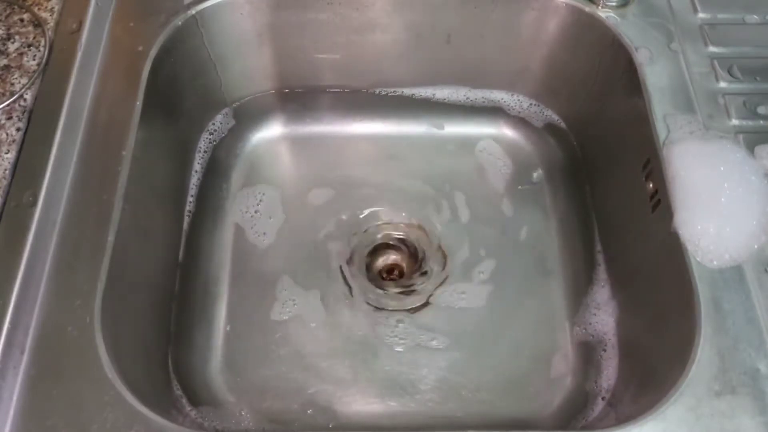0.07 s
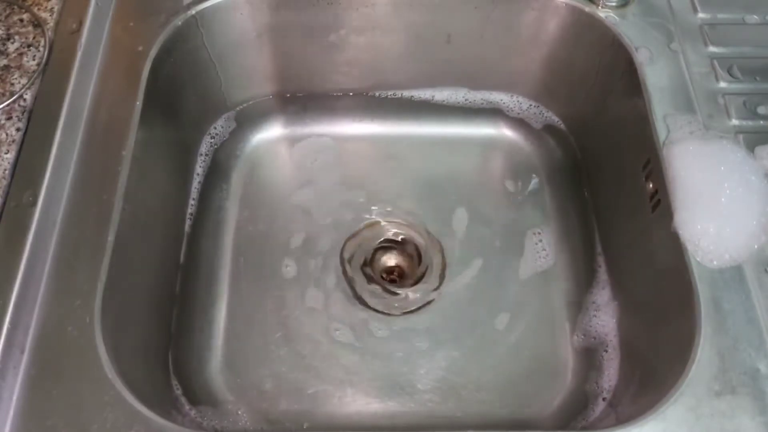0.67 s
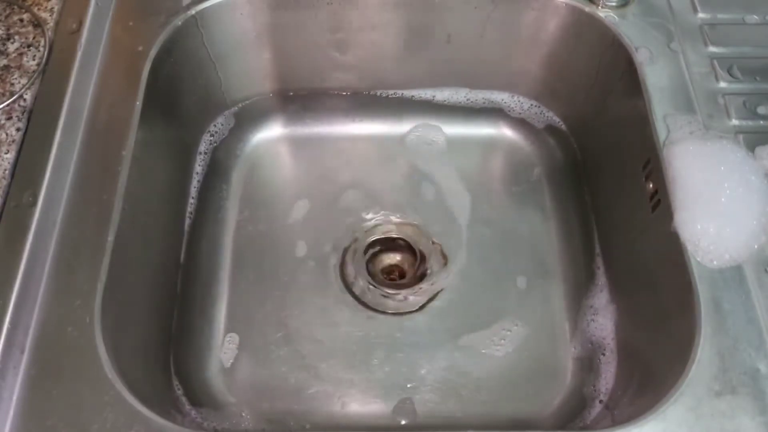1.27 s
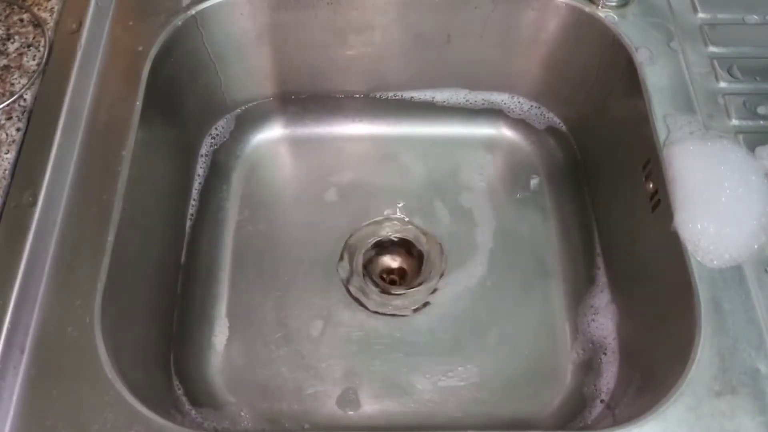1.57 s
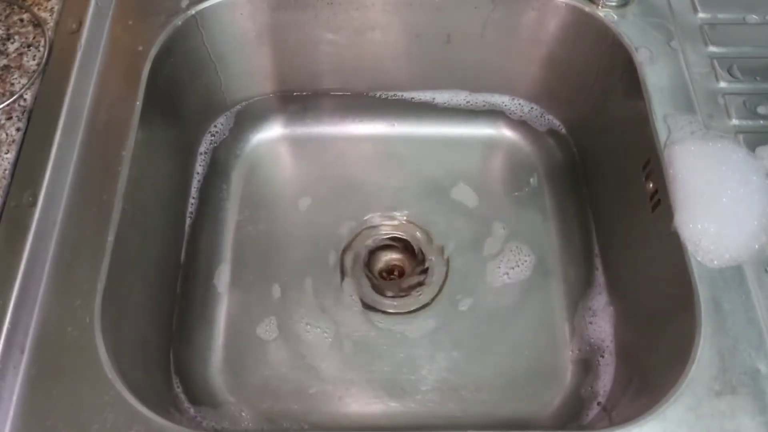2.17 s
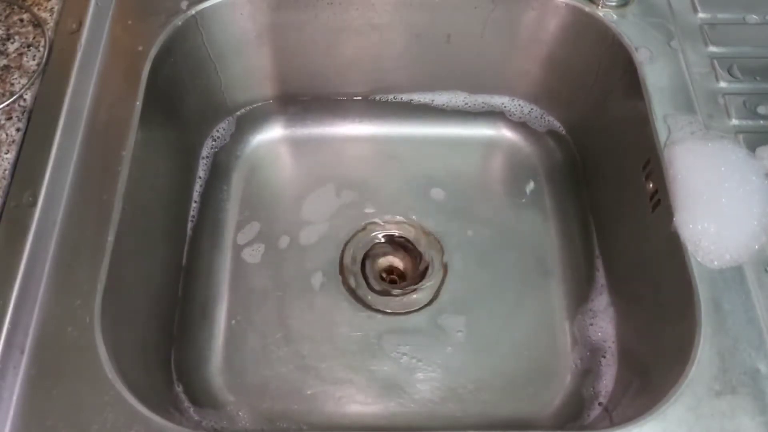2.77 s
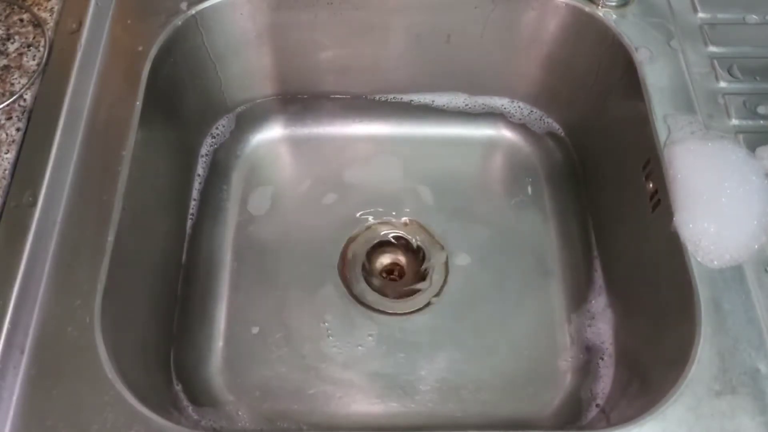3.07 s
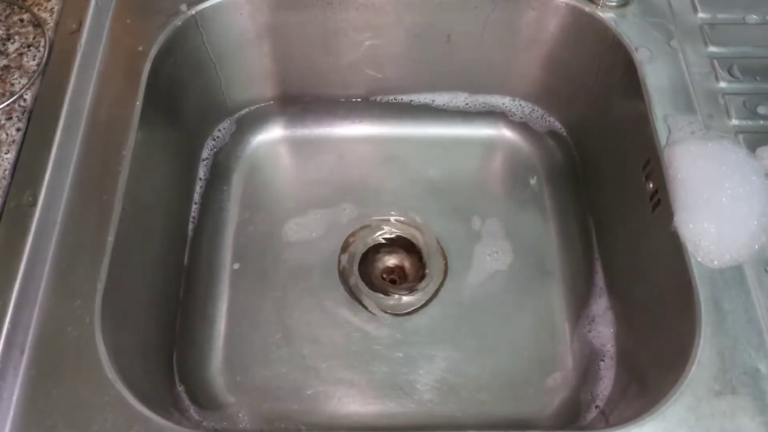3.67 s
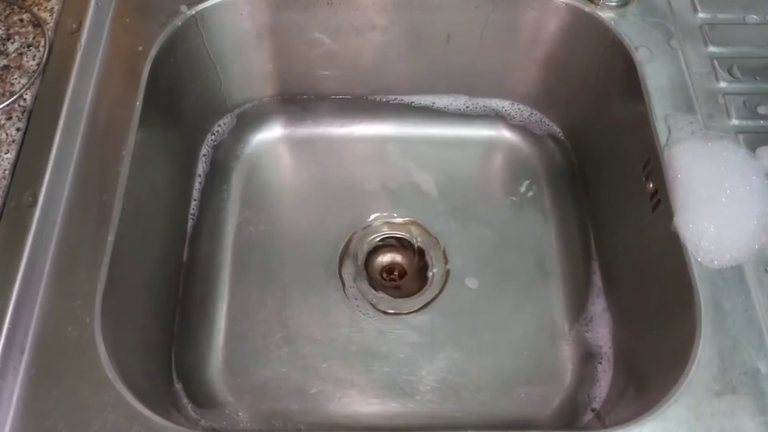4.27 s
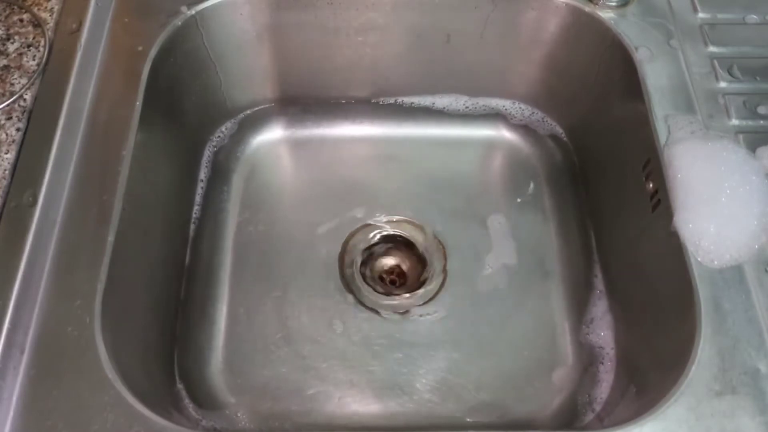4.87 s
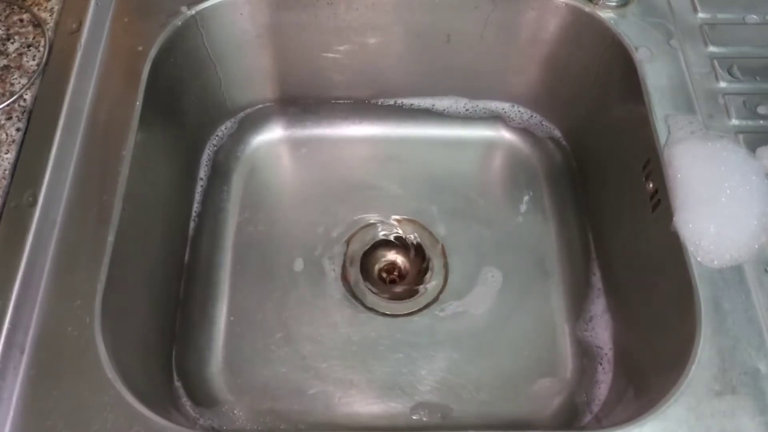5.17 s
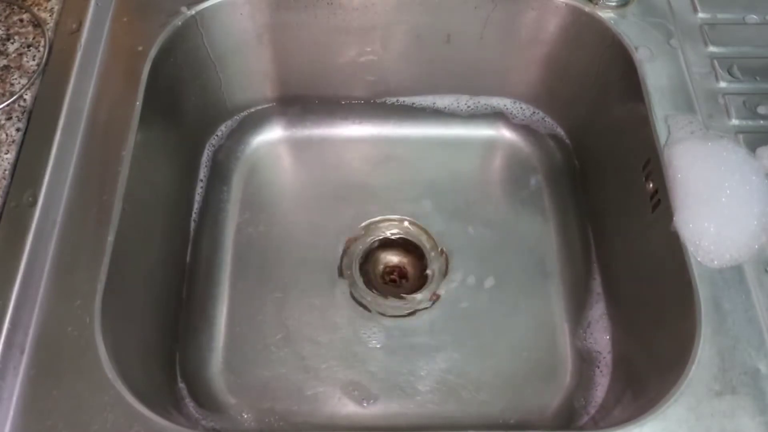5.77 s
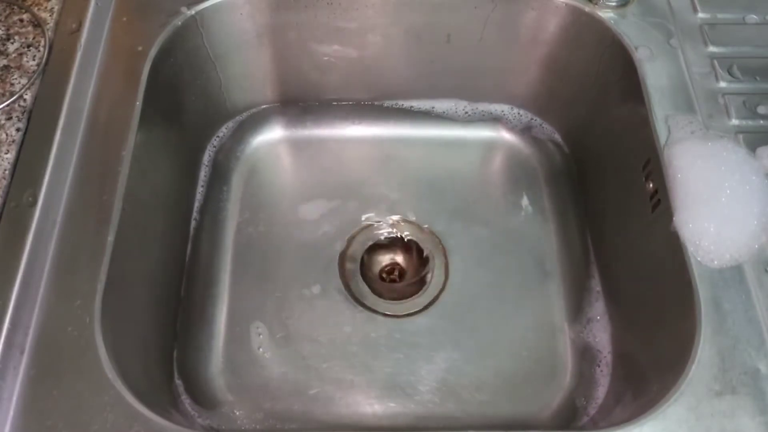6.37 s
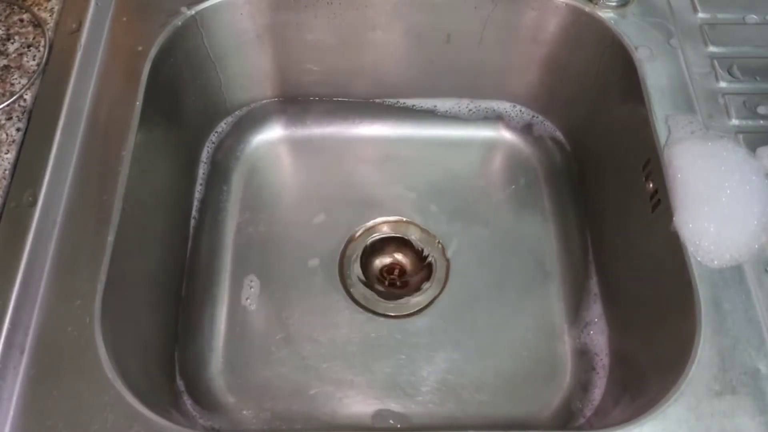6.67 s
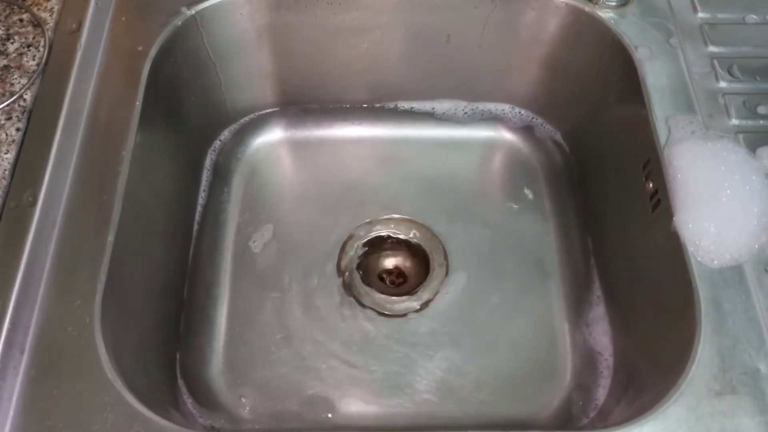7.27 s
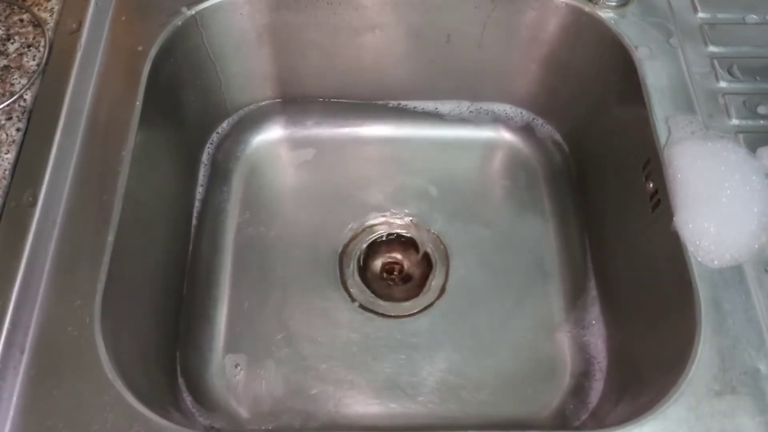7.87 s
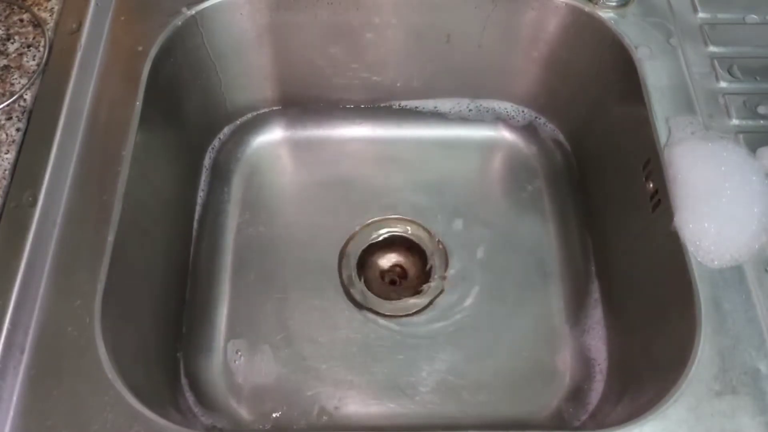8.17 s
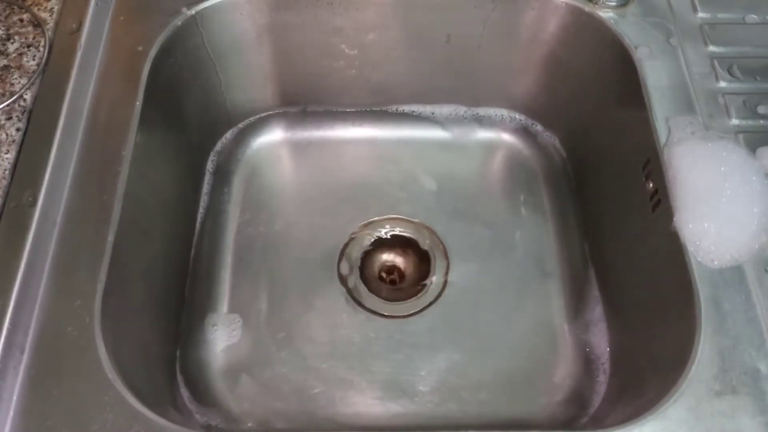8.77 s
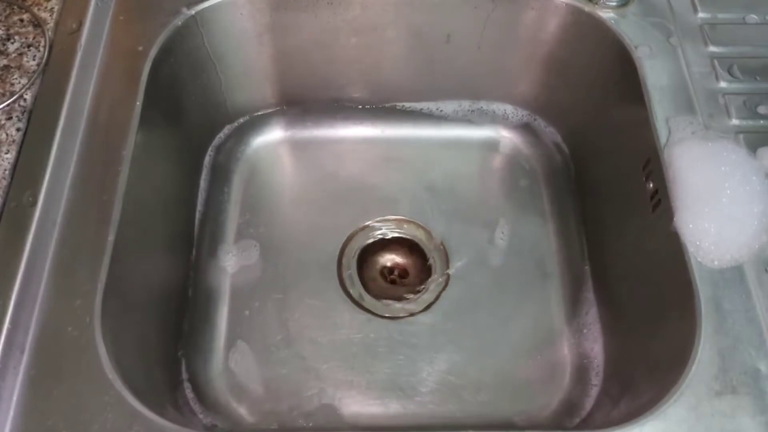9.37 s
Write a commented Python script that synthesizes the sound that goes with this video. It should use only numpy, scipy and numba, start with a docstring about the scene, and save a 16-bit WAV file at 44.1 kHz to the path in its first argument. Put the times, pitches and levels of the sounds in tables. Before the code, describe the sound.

The last water swirls down a steel kitchen sink's drain, gurgling and glugging over a low pipe drone, with tiny plinks and fizzing foam.

```python
"""The last shallow water swirls down the plughole of a steel kitchen sink, heard from just above.
From the start the falling stream rushes and makes the waste pipe drone, gulps of air gurgle as bubbles
in the throat under the strainer, small bubbles plink at the rim and foam fizzes; steel walls and kitchen
throw the bubbling back. From 0.5 s to 7.2 s occasional puffs of air thud on the microphone.
Two strong glugs come near 2.1 s; the water is still draining at the end, 9.4 s."""
import sys
import numpy as np
from scipy import signal
from scipy.fft import rfft, irfft, next_fast_len
from scipy.io import wavfile
from scipy.ndimage import uniform_filter1d
from numba import njit

SR = 44100
rng = np.random.default_rng(int(sys.argv[2]) if len(sys.argv) > 2 else 0)


def store_wav(level_fs):
    """Save 16-bit WAV to argv[1]."""
    pcm = np.round(np.clip(np.atleast_2d(level_fs), -1, 1) * 32767)
    wavfile.write(sys.argv[1], SR, pcm.T.astype(np.int16))


N = 415422
TIME_S = np.arange(N) / SR
FFT_SIZE = next_fast_len(N + SR)
FREQ_HZ = np.arange(FFT_SIZE // 2 + 1) * SR / FFT_SIZE + 1e-3

# spurts of the film breaking over the rim: start/s, length/s, relative level/dB, typical bubble f/Hz
SPURTS = [(-0.1, 1.05, -56, 7660), (0.6, 0.75, -53, 6330), (1.07, 0.4, -54.5, 7650),
          (2.21, 0.26, -55, 7500), (2.26, 1.5, -60, 6160), (2.6, 0.51, -54, 4500), (4.75, 0.35, -58, 10900),
          (3.21, 0.46, -58.5, 9200), (3.55, 0.79, -56.5, 4080), (4.02, 0.25, -57.5, 7400),
          (4.13, 0.51, -54, 7000), (4.55, 0.66, -53, 4560), (5.52, 0.31, -62, 8700), (5.7, 0.46, -57, 3660),
          (6.25, 0.16, -58, 10270.0), (7.12, 0.23, -62, 5670.0), (7.79, 0.3, -57.5, 11500),
          (8.38, 0.32, -57.5, 6000), (8.51, 0.54, -55, 10500), (8.85, 0.79, -60, 11500)]
SPURT_FALLOFF_DB = 12  # one octave from the typical pitch
SWELL_SHARE = 0.33  # rising part of a gulp, spurt or puff


def undb(db):
    """Decibels to gain."""
    return 10 ** (np.asarray(db) / 20)


def level(x, db):
    """Scale to an rms level."""
    return x * undb(db) / np.sqrt(np.mean(x ** 2))


def filtered(x, response):
    """Apply a frequency response."""
    return irfft(rfft(x, FFT_SIZE) * response, FFT_SIZE)[..., :N]


def resonances(modes):
    """Response of damped resonators driven together."""
    return sum(undb(db) / (1 + 1j * (FREQ_HZ ** 2 - hz ** 2) / (FREQ_HZ * width_hz))
               for hz, width_hz, db in modes)


def walk(rate_hz):
    """Random steps, smoothed twice; spread near 1."""
    hold = int(SR / rate_hz)
    steps = np.repeat(rng.standard_normal(2048), hold)[:N]
    return 1.3 * uniform_filter1d(uniform_filter1d(steps, hold), hold)


def stereo(mid, side):
    """Mid and side to left and right."""
    return mid + side * np.array([[1], [-1]])


@njit
def ring(starts_s, hz, cycles, gains, rise, swell_cycles):
    """Bubbles: sines that swell, then die by 60 dB over their life as the pitch rises."""
    out = np.zeros(N)
    for k in range(len(starts_s)):
        first, length = int(starts_s[k] * SR), cycles[k] * SR / hz[k]
        phase = 0.
        for i in range(min(int(length), N - first)):
            phase += hz[k] * (1 + rise * i / length) / SR
            attack = 1 - np.exp(-(phase / swell_cycles) ** 2)
            decay = np.exp(-np.log(1000) * i / length)
            out[first + i] += gains[k] * attack * decay * np.sin(2 * np.pi * phase)
    return out


def swarm(count, band_hz, cycles, spread_db, rise, swell_cycles):
    """Unevenly timed bubbles of random pitch, most faint, a few strong; rms 1."""
    low_hz, high_hz = band_hz
    jitter, pitch, life, faintness = rng.random((count, 4)).T
    starts_s = (np.arange(count) + 2 * jitter) / count * N / SR
    hz = low_hz * (high_hz / low_hz) ** pitch
    gains = undb(-spread_db * np.log(faintness + .04))
    return level(ring(starts_s, hz, cycles * (.5 + life), gains, rise, swell_cycles), 0)


def pops(table, cycles, rise, swell_cycles):
    """One bubble per row of t/s, level/dB, f/Hz."""
    starts_s, db, hz = np.transpose(table)
    return ring(starts_s, hz, np.full(len(hz), float(cycles)), undb(db), rise, swell_cycles)


def swell_and_fade(t, start_s, length_s):
    """Triangular envelope of a gulp, spurt or puff."""
    return np.interp(t, start_s + length_s * np.array([0, SWELL_SHARE, 1]), [0, 1, 0])


def bursts(table, bubble_hz, falloff_db, steady_db, sag_oct_per_s=0.27):
    """Gain of one bubble size: steady supply plus bursts whose pitch sinks as their bubbles grow."""
    t = TIME_S[::64]
    power = undb(steady_db) ** 2
    for start_s, length_s, db, hz in table:
        octaves_off = np.log2(bubble_hz / hz) + sag_oct_per_s * (t - start_s - SWELL_SHARE * length_s)
        gain = swell_and_fade(t, start_s, length_s) * undb(db - falloff_db * octaves_off ** 2)
        power = power + gain ** 2
    return np.interp(TIME_S, t, np.sqrt(power))


def space(x, walls_db, basin_db, kitchen_db, basin_t60_s=0.12, kitchen_t60_s=0.22, pan_db=-1.5):
    """Direct sound, single reflections, quick basin flutter and soft kitchen tail."""
    # reflections off steel walls and kitchen: delay/s, left/dB, right/dB (both relative to walls_db)
    echoes = [(.0013, -25, -34), (.0021, -35, -24), (.0075, -6.5, -2), (0.019, -21, -13)]
    out = x * undb(np.array([[pan_db], [-pan_db]]) / 2)
    for delay_s, left_db, right_db in echoes:
        lag = int(delay_s * SR)
        out[:, lag:] += x[:N - lag] * undb(walls_db + np.array([[left_db], [right_db]]))
    t = TIME_S[:SR // 2]
    tail_power = 0
    for onset_s, t60_s, db in ((.002, basin_t60_s, basin_db), (.009, kitchen_t60_s, kitchen_db)):
        decay = (t > onset_s) * np.exp(-2 * np.log(1000) * t / t60_s)
        tail_power = tail_power + undb(db) ** 2 * decay / decay.sum()
    # moving water: the scattered sound drifts between four sets of paths
    shares = np.array([walk(rate_hz=6) for _ in range(4)])
    shares /= np.sqrt(np.sum(shares ** 2, axis=0) + .05)
    for share in shares:
        tail = rng.standard_normal((2, len(t))) * np.sqrt(tail_power)
        out += share * signal.oaconvolve(x[None], tail, axes=1)[:, :N]
    return out


def pipe_drone(slosh_db=2, slosh_hz=11, cutoff_hz=116):
    """The falling stream shakes the waste pipe's air column; sloshing makes the drone waver."""
    # drone of the water falling down the pipe: t/s, relative level/dB
    fall = [(0.0, -44.5), (0.26, -39), (0.36, -48), (0.43, -40.5), (0.6, -43.5), (0.73, -37.5),
            (0.8, -48.5), (1.05, -40), (1.21, -44), (1.41, -38), (1.47, -53), (1.54, -39.5), (1.7, -40),
            (1.77, -49.5), (1.9, -43.5), (2.25, -38.5), (2.33, -43.5), (2.58, -40), (2.65, -52),
            (2.75, -38), (2.97, -46.5), (3.03, -35.5), (3.14, -44), (3.5, -45.5), (3.58, -35), (3.76, -45),
            (3.84, -40), (4.31, -42), (4.38, -37.5), (4.5, -46.5), (5.19, -40.5), (5.43, -42.5),
            (5.55, -42), (5.85, -39.5), (6.0, -35.5), (6.18, -44), (6.27, -33.5), (6.35, -44.5),
            (6.71, -38.5), (7.2, -44), (7.66, -43.5), (7.75, -50), (8.05, -37), (8.5, -41), (9.42, -42.5)]
    # lowest air resonance of the pipe: f/Hz, width/Hz, gain/dB
    pipe_mode = [(93.7, 22.2, 0)]
    flow_db = np.interp(TIME_S, *np.transpose(fall)) + slosh_db * walk(slosh_hz)
    lowpass = 1 / np.sqrt(1 + (FREQ_HZ / cutoff_hz) ** 20)
    column, scattered = filtered(rng.standard_normal((2, N)), resonances(pipe_mode) ** 2)
    # steady drive: flatten the noise envelope so that strength follows flow
    window = np.hanning(SR // 10) * 20 / SR
    envelope = np.sqrt(signal.fftconvolve(column ** 2, window, "same") + 1e-12)
    mid = level(filtered(column / envelope * undb(flow_db), lowpass), -44)
    side = level(filtered(scattered, lowpass), -69)
    return stereo(mid, side) * undb([[.4], [-.4]])


def trap_splash():
    """Splashing along the pipe rings the trap; part arrives centred, part scattered."""
    # hollow resonances of trap and basin: f/Hz, width/Hz, relative gain/dB
    trap_modes = [(163, 11.4, -8), (212, 50, -15.5), (296, 9.5, -14.5), (326.5, 22.5, -3.5),
                  (395.1, 8.3, 6.5), (411, 22.5, -0.5), (544, 110, -12), (621.5, 21, -3), (672.3, 23, -3.5)]
    splashes = np.array([swarm(9000, (135.8, 904), cycles=4.37, spread_db=2, rise=0.26, swell_cycles=0.26)
                         for _ in range(2)])
    mid, side = filtered(splashes * undb(0.86 * walk(rate_hz=9)), resonances(trap_modes))
    return stereo(level(mid, -50.5), level(side, -63.5))


def stream_rush(wander_db=2.5):
    """Smooth noise of moving water; the bass is nearly mono."""
    # spectrum of the stream: f/Hz, relative density/dB
    spectrum = [(20, -28), (48, 4), (75, 7), (135, -13), (220, -8.5), (550, -6), (850, -14), (1200, -13.5),
                (2600, -20.5), (3600, -31), (8000, -35.5), (15000, -40)]
    hz, db = np.transpose(spectrum)
    colour = undb(np.interp(np.log(FREQ_HZ), np.log(hz), db))
    width = 0.53 * np.interp(FREQ_HZ, [45, 170, 700, 11000], [0.13, 0.23, 1.8, 0.88])
    mid = filtered(rng.standard_normal(N), colour)
    side = filtered(rng.standard_normal(N), colour * width)
    return level(stereo(mid, side), -50) * undb(wander_db * walk(rate_hz=9.3))


def throat_gurgle(falloff_db=27.5):
    """The vortex tears gulps of air into bubbles, which ring the cavity under the strainer."""
    # gulps of air drawn in: start/s, length/s, relative level/dB, typical bubble f/Hz
    gulps = [(-0.26, 1.15, -45, 1960), (0.76, 0.36, -42.5, 1850), (0.92, 0.39, -39, 1500),
             (1.08, 0.37, -47.5, 2250), (1.3, 0.48, -43, 1640), (1.62, 0.24, -42, 1010),
             (1.76, 0.73, -38.5, 1680), (1.88, 0.38, -47.5, 2420), (2.07, 0.1, -47, 3200),
             (2.18, 0.38, -45, 1610), (2.42, 0.55, -46, 1900), (2.75, 0.21, -42, 900),
             (3.06, 0.24, -43, 2000), (3.14, 0.47, -40.5, 1590), (3.33, 0.24, -42.5, 900),
             (3.56, 0.46, -43.5, 1880), (3.92, 0.14, -42.5, 890), (4.08, 0.28, -40, 920),
             (4.1, 0.28, -45.5, 1860), (4.27, 0.23, -39.5, 1730), (4.85, 0.49, -45.5, 1000),
             (4.98, 0.3, -42, 1450), (5.3, 0.3, -44, 1850), (5.52, 0.18, -44, 950),
             (5.55, 0.29, -45.5, 1590), (5.82, 0.21, -42, 1680), (5.85, 0.26, -49, 2950),
             (5.95, 0.67, -49.5, 1550), (6.39, 0.35, -43, 2030), (6.92, 0.28, -49, 2460),
             (7.42, 0.21, -52, 2800), (7.03, 0.8, -49.5, 1520), (6.97, 0.45, -43.5, 960),
             (7.22, 0.41, -43.5, 980), (7.45, 0.81, -49, 1900), (7.66, 0.61, -57.5, 3100),
             (7.86, 0.26, -49.5, 1200), (8.18, 0.3, -43, 1820), (8.34, 0.17, -45, 890),
             (8.49, 0.35, -46.5, 1560), (8.66, 0.31, -40, 1960), (8.7, 0.52, -45, 900),
             (8.72, 0.49, -60, 3200), (8.84, 0.29, -45.5, 1860)]
    # big bubbles bursting in the throat: t/s, relative level/dB, f/Hz
    big_bubbles = [(0.1788, -23.5, 1800), (1.007, -21.5, 1750), (1.061, -21, 1670), (1.076, -22, 1650),
                   (1.151, -21, 1850), (1.202, -22.5, 1820), (1.4893, -28, 1710), (2.0903, -15.5, 1670),
                   (2.1235, -14.5, 1480), (2.173, -24, 1690), (2.232, -23, 1740), (2.2697, -19, 1520),
                   (2.313, -25, 1700), (2.6953, -28, 1800), (3.1146, -23, 1800), (3.263, -25, 1900),
                   (3.3215, -24, 1820), (3.6287, -23, 1630), (3.6805, -20, 1830), (3.8493, -22.5, 1640),
                   (4.204, -28, 1850), (4.4587, -19.5, 1720), (4.579, -28.5, 1840), (5.521, -23.5, 1670),
                   (5.5398, -20.5, 1780), (5.791, -28, 1780), (5.897, -20.5, 1850), (6.0583, -21.5, 1670),
                   (6.132, -19, 1630), (7.243, -24, 1340), (7.385, -27, 1400), (7.415, -25, 1010),
                   (7.7223, -27, 1800), (7.8321, -20.5, 1870), (8.297, -26, 1790), (8.544, -24.5, 1680),
                   (8.9443, -18.5, 1750), (8.974, -24.5, 1850)]
    # throat resonances: f/Hz, width/Hz, gain/dB
    throat_modes = [(1006.6, 23, 3.5), (1318, 25, -1), (1540, 73, -6), (1612, 110, -7), (1808, 117, -2.5),
                    (1840, 46, 4), (2198, 24, 8), (2377, 24, 1), (2460, 21, -12), (2604, 21, -19),
                    (2750, 17, -2), (2925, 24, -14), (2940, 51, -21)]
    cavity = resonances(throat_modes) + undb(-11.5)  # bubbles near the mouth also bypass the cavity
    swarms = [swarm(3400, (762, 1185), cycles=10.8, spread_db=5.5, rise=0.15, swell_cycles=1.6),
              swarm(2300, (1314, 1970), cycles=25.2, spread_db=2.5, rise=0.11, swell_cycles=4.4),
              swarm(1500, (1955, 2577), cycles=45, spread_db=5.5, rise=0.15, swell_cycles=2.7),
              swarm(1200, (2555, 3125), cycles=51, spread_db=3.5, rise=0.08, swell_cycles=1.9),
              swarm(1600, (3050, 4130), cycles=41, spread_db=4.5, rise=0.085, swell_cycles=3.8)]
    # per swarm: typical f/Hz, relative level/dB, steady supply/dB
    mix = [(1064, -10.5, -53), (1600, -4.5, -50.5), (2300, -8, -54), (2850, -6.5, -58), (3550, -10, -64)]
    gurgle = sum(level(filtered(bubbles, cavity), db) * bursts(gulps, hz, falloff_db, steady_db)
                 for bubbles, (hz, db, steady_db) in zip(swarms, mix))
    glugs = undb(6.5) * filtered(pops(big_bubbles, cycles=11.6, rise=0.023, swell_cycles=2.25), cavity)
    # a few bubbles ride the vortex and ring longer, as clear rising notes
    notes = swarm(170, (1247, 3047), cycles=61, spread_db=4, rise=0.095, swell_cycles=2.7)
    notes *= undb(-16.5) * bursts(gulps, 1640, falloff_db, steady_db=-48.5)
    gurgle *= undb(0.55 * walk(rate_hz=32))
    return space(gurgle + glugs + notes, walls_db=-7, basin_db=-4, kitchen_db=-7)


def rim_bubbles():
    """Tiny bubbles in the open: trickle and fine crackle in spurts, single bright plinks."""
    # loudest bubbles popping in the open: t/s, relative level/dB, f/Hz
    single_bubbles = [(0.1015, -44.5, 4400), (0.2783, -40, 2720), (0.2947, -44, 2980),
                      (0.6985, -48.5, 3800), (0.769, -57, 7060), (0.847, -47, 6850), (0.9256, -49, 4300),
                      (1.14, -54, 4650), (1.6382, -48, 3740), (2.124, -49, 3260), (2.3087, -42, 7140),
                      (2.449, -49.5, 8440), (2.6106, -50, 6970), (2.6587, -51.5, 4340), (2.7615, -45, 2800),
                      (2.9003, -50.5, 4430), (3.0135, -45.5, 6580), (3.1151, -37, 2470),
                      (3.1539, -45, 3750), (3.543, -53, 5300), (3.783, -54, 5300), (4.1111, -50, 8140),
                      (4.2246, -48, 3180), (4.2903, -49, 6200), (4.3796, -45, 2680), (4.4536, -51, 4530),
                      (4.5669, -51, 3560), (4.7286, -39.5, 5120), (4.784, -50, 4480), (4.829, -39, 4460),
                      (4.929, -56, 4480), (5.1759, -50, 4830), (5.412, -46, 2170), (5.5892, -48, 6700),
                      (5.729, -47, 8760), (5.9323, -45, 2880), (6.2273, -53, 4600), (6.7896, -48.5, 8810),
                      (6.9133, -49, 3240), (6.9658, -50, 5730), (7.2433, -46.5, 4600), (7.381, -49.5, 8000),
                      (7.7225, -46.5, 3060), (7.9113, -46, 2840), (8.0528, -51, 4300), (8.3654, -49, 4100),
                      (8.5687, -42, 4390), (8.5725, -49, 5640), (8.7852, -48, 2830), (8.8148, -54, 4000),
                      (8.8974, -42, 3100)]
    trickle = swarm(2200, (3677, 4965), cycles=46, spread_db=8, rise=0.044, swell_cycles=3.3)
    ticks = swarm(1500, (5260, 9140), cycles=39, spread_db=4, rise=0.031, swell_cycles=3.9)
    crackle = swarm(1300, (3800, 9400), cycles=12, spread_db=8.5, rise=0.03, swell_cycles=1.0)
    trickle *= undb(-11.5 + 3.3 * walk(rate_hz=24))
    trickle *= bursts(SPURTS, 4250, SPURT_FALLOFF_DB, steady_db=-64)
    treble = undb(-12.5) * (ticks + crackle) * bursts(SPURTS, 7500, SPURT_FALLOFF_DB, steady_db=-66.5)
    plinks = undb(12.5) * pops(single_bubbles, cycles=33.3, rise=0.02, swell_cycles=1.92)
    return space(trickle + treble + plinks, walls_db=-14, basin_db=1.5, kitchen_db=-7.5)


def foam(hiss_cutoff_hz=9000):
    """Thin foam fizzes across the basin floor, wide in stereo; cells snap, many faintly, a few loudly."""
    # foam cells and droplets snapping: t/s, relative level/dB, f/Hz
    cells = [(0.277, -42.5, 9000), (0.2965, -41.5, 5370), (0.458, -50, 3900), (0.5148, -42, 8800),
             (1.6277, -42.5, 8400), (2.3077, -39, 9300), (3.2625, -44, 9350), (4.089, -43, 11500),
             (4.6126, -42.5, 8150), (5.384, -44.5, 8800), (5.589, -42, 7960), (5.791, -43, 3860),
             (6.3056, -43, 9650), (6.789, -46, 8960), (7.5144, -41.5, 8120)]
    mid, side = (swarm(3000, (8480, 15000), cycles=22, spread_db=5.5, rise=0.038, swell_cycles=3.0)
                 for _ in range(2))
    highpass = 1 / (1 + (hiss_cutoff_hz / FREQ_HZ) ** 6)
    hiss = level(filtered(rng.standard_normal((2, N)), highpass), -1)
    fizz = (undb(-8.5) * stereo(mid, side) + hiss) * undb(-4 + 3.1 * walk(rate_hz=22))
    fizz *= bursts(SPURTS, 10400, SPURT_FALLOFF_DB, steady_db=-68)
    spatter = swarm(420, (4500, 12000), cycles=13, spread_db=4.5, rise=0.037, swell_cycles=1.5)
    snaps = undb(8.5) * pops(cells, cycles=10, rise=0.032, swell_cycles=0.53)
    return fizz + space(undb(-76.5) * spatter + snaps, walls_db=2, basin_db=3.5, kitchen_db=-20)


def draught(steady_db=-65):
    """Moving air thuds softly on each side of the microphone, over a faint rumble."""
    # puffs of air: start/s, length/s, level/dB
    puffs = [(0.547, 0.13, -45), (1.95, 0.15, -45), (2.604, 0.19, -43), (3.344, 0.097, -43),
             (3.63, 0.2, -45), (3.96, 0.15, -39), (6.83, 0.36, -43)]
    rumble = level(filtered(rng.standard_normal((2, N)), resonances([(51.3, 59, 0)]) ** 2), 0)
    gusts = sum(undb(db) * swell_and_fade(TIME_S, start_s, length_s) for start_s, length_s, db in puffs)
    return rumble * (undb(steady_db) + gusts)


def scene():
    """All sources summed, stereo."""
    drain = pipe_drone() + trap_splash() + throat_gurgle()
    return drain + rim_bubbles() + foam() + stream_rush() + draught()


def record(dry, lead_s=.00002, cutoff_hz=15250):
    """The left side, slightly nearer the sink, leads; a steep low-pass cuts the top."""
    left = filtered(dry[0], np.exp(2j * np.pi * FREQ_HZ * lead_s))
    lowpass = signal.ellip(10, .2, 70, cutoff_hz, fs=SR, output="sos")
    return signal.sosfilt(lowpass, np.array([left, dry[1]]))


dry = scene()
out = record(dry)
store_wav(out)
```